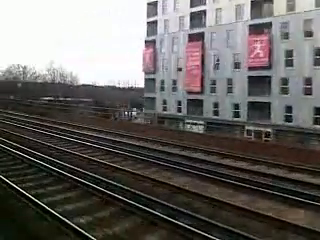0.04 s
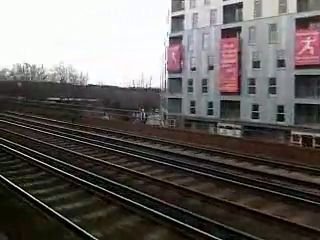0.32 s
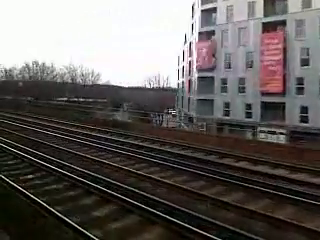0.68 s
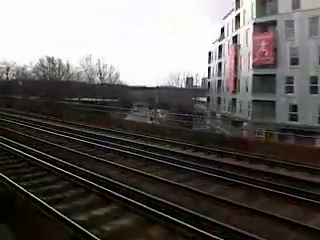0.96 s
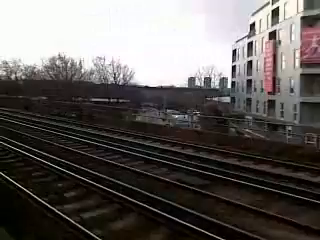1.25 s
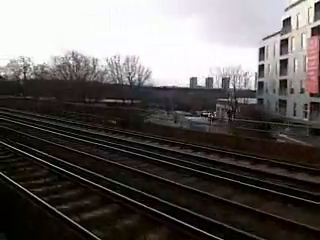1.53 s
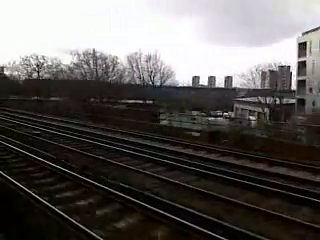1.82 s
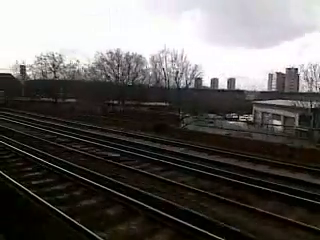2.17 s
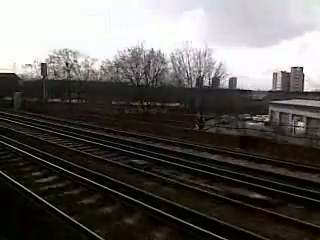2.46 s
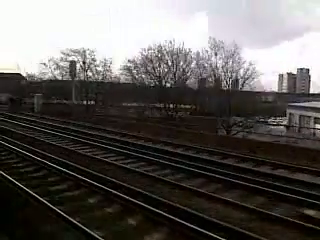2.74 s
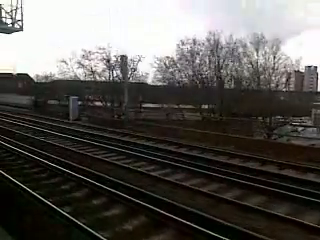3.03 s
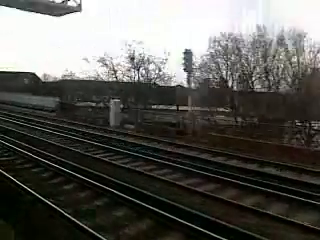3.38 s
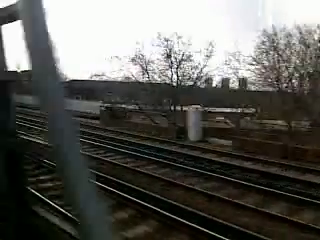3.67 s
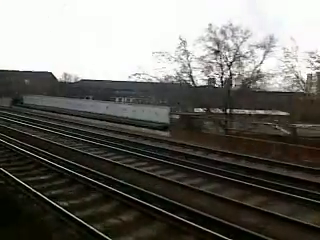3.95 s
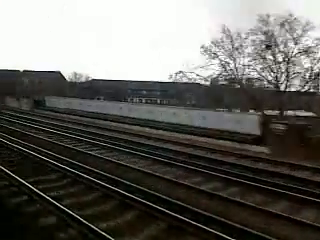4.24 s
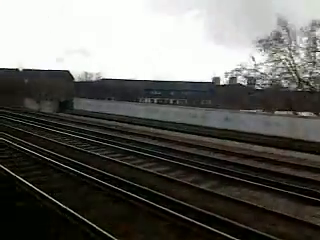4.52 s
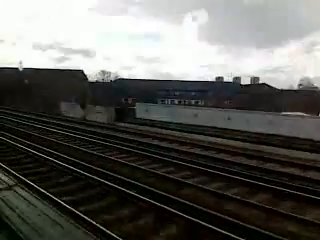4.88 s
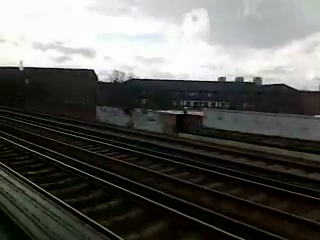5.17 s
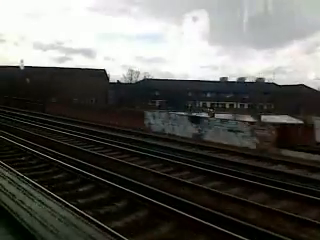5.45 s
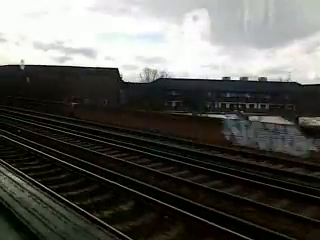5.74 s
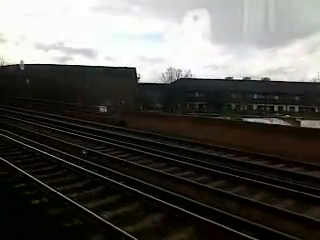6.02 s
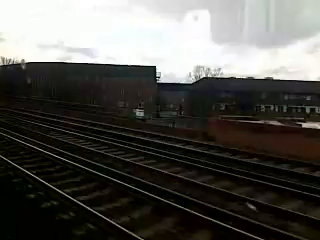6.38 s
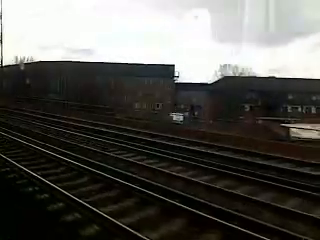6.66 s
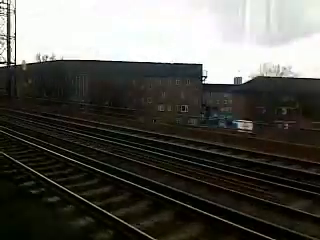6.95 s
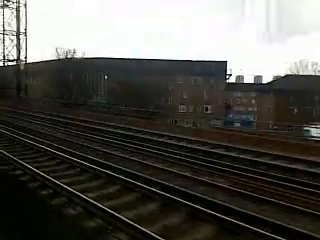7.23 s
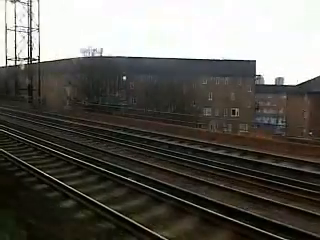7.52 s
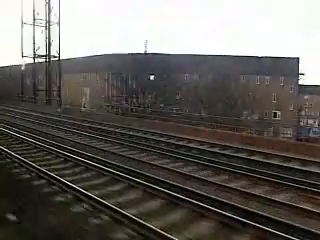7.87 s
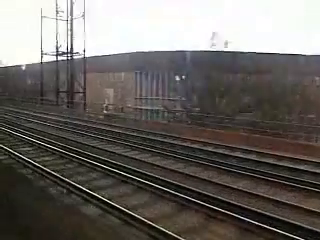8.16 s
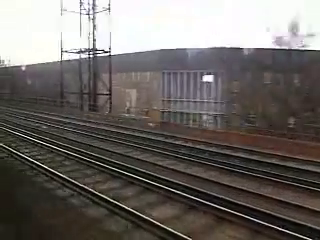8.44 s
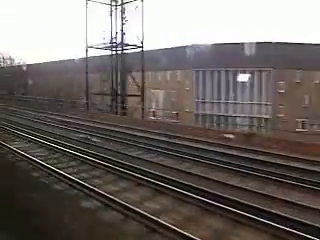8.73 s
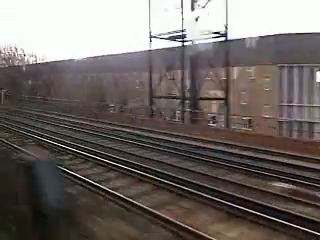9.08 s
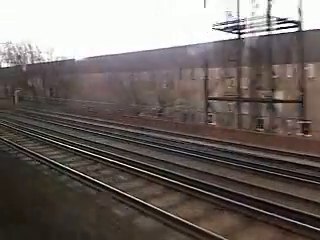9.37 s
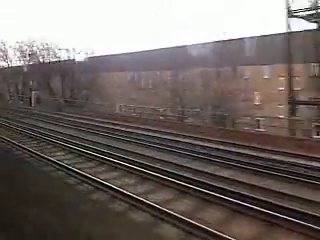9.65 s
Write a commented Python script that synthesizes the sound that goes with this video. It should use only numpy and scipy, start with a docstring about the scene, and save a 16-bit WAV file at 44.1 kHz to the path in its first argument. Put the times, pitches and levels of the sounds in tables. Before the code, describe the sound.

An electric train rumbles along, heard from inside, with a faint gear whine, knocks over points and wheels singing on a curve.

```python
"""Inside an electric train that slowly gathers speed. From the start the body rumbles, the wheels roar on
the rails, a gear whine climbs and an auxiliary machine hums; now and then something rustles faintly.
From 2 s to nearly 4 s the bogies cross a set of points: impacts ring the floor and flanges scrape.
Then side force on a curve makes the wheels sing more and more, until the sound stops abruptly at 8.9 s."""
import sys
import numpy as np
from scipy import signal
from scipy.fft import rfft, irfft
from scipy.io import wavfile

SR = 44100
rng = np.random.default_rng(int(sys.argv[2]) if len(sys.argv) > 2 else 0)


def master(y):
    """Save y as 16-bit WAV."""
    cut = np.clip(np.atleast_2d(y).T, -1, 1)
    pcm = np.round(cut * 32767)  # scale
    wavfile.write(sys.argv[1], SR, pcm.astype(np.int16))


N = 432180
TIME = np.arange(N) / SR
BINS = np.fft.rfftfreq(N, 1 / SR)

# spectrum of the carriage body's vibration: (frequency [Hz], density [dB per Hz])
BODY_SPECTRUM = [(6, -88.5), (18, -62), (30, -60.5), (62, -55.5), (100, -59.5), (170, -59.5), (205, -64),
                 (245, -66), (310, -70.5), (420, -73), (600, -89), (1200, -115)]
# slow course of the deep rumble: (time [s], gain [dB])
DEEP_RUMBLE_GAIN = [(0, 0.5), (1.5, 2.5), (2.6, -3), (4.2, -1.5), (5.6, -1), (6.8, 1), (8.9, -1.5)]
# dips in the track: (centre time [s], duration [s], swell [dB])
TRACK_DIPS = [(2.05, 0.22, 6), (2.57, .1, 6), (3.319, 0.088, 12.5), (4.657, 0.16, 3.5), (6.3, 0.17, 3.5),
              (7.38, 0.22, 2), (7.824, 0.14, 5.5), (8.225, 0.088, 8)]


def body_rumble(sway_db=1.5, crossover_hz=112):
    """Forced vibration: the track shakes the body, whose lowest frequencies swell at each dip."""
    heave_db = sum(db * swell(s, length) for s, length, db in TRACK_DIPS)
    shake_db = follow(DEEP_RUMBLE_GAIN) + sway_db * drift(5) + heave_db
    rumble = noise(BODY_SPECTRUM)
    deep = irfft(rfft(rumble) / (1 + (BINS / crossover_hz) ** 6), N)
    return rumble - deep + deep * gain_of(shake_db)


# rolling noise through floor and windows: (frequency [Hz], density [dB per Hz])
ROLLING_SPECTRUM = [(120, -90), (350, -78), (490, -74.5), (535, -70), (820, -72), (1350, -74.5),
                    (1950, -76), (2170, -77), (2420, -84.5), (3100, -87), (4700, -99), (6300, -102),
                    (9000, -116), (14000, -135)]
# effect of rail roughness on the roar: (time [s], gain [dB])
RAIL_ROUGHNESS = [(0, -1.3), (1, -1.4), (1.35, -0.3), (1.8, -1.2), (2.2, -0.9), (3.4, -3), (4.3, -1.66),
                  (5.6, -0.55), (6.6, -1), (7.3, 0.7), (7.9, -1.5), (8.9, 0)]
# rough patches of rail: (centre time [s], duration [s], level [dB])
HISSING_PATCHES = [(.54, 0.15, -55), (.78, .25, -61), (2.58, 0.27, -67), (5.1, .3, -72),
                   (5.552, 0.2, -56.5), (6.0, 0.51, -66), (7.0, 0.78, -67)]
# spectrum of their hiss: (frequency [Hz], relative level [dB])
PATCH_SPECTRUM = [(1200, -21), (2600, 4), (3400, 1.5), (4200, -12), (6000, -14.5), (12000, -47)]


def rolling_noise(flutter_db=0.83):
    """Roughness excitation: the uneven rail head makes the wheels roar, and hiss on rough patches."""
    roar = noise(ROLLING_SPECTRUM) * gain_of(follow(RAIL_ROUGHNESS) + flutter_db * drift(14))
    hiss = evened(noise(PATCH_SPECTRUM)) * swells(HISSING_PATCHES)
    return roar + hiss


# wheel modes: (frequency [Hz], width [Hz], level on straight track [dB], level in the curve [dB])
WHEEL_RESONANCES = [(1553, 34, -58, -51.5), (1680, 130, -58, -49.5), (1782, 37, -74.5, -54)]
# side force on the wheels: (time [s], share of full force [0-1])
SIDE_FORCE = [(0, 0.06), (3.8, 0.24), (4.6, 0.6), (5.5, 0.84), (6.1, 1), (6.6, 0.6), (7.3, 0.96), (8, 1),
              (8.9, 0.88)]
# clear notes of a single wheel: (centre time [s], duration [s], frequency [Hz], level [dB])
WHEEL_NOTES = [(2.33, 0.051, 1600, -45), (3.07, .25, 1587, -50), (4.75, 0.8, 1570, -52),
               (6.845, 0.06, 1760, -47), (6.9, 0.8, 1620, -55), (8.201, 1.34, 1561, -52)]


def wheel_squeal(flutter_db=0.5):
    """Resonance: side force drives the wheels' own modes, and at times one clear note sings out."""
    force = follow(SIDE_FORCE)
    modes, notes = np.zeros((2, N))
    for hz, width, straight_db, curved_db in WHEEL_RESONANCES:
        modes += narrowband(hz, width) * gain_of(straight_db + (curved_db - straight_db) * force)
    for s, length, hz, db in WHEEL_NOTES:
        note = tone(hz, waver_hz=2.87, flutter_db=1.5, flutter_rate=12.5)
        notes += note * gain_of(db) * swell(s, length)
    return notes + modes * gain_of(flutter_db * drift(6.2))


# tooth meshing rate: (time [s], frequency [Hz])
MESH_RATE = [(0, 1030), (2, 1041), (4, 1057), (5.4, 1069), (7, 1081), (8.9, 1095)]
# whine under changing gear load: (time [s], level [dB])
WHINE_LEVEL = [(0, -72), (.4, -50), (1.05, -56), (1.3, -49.5), (1.75, -52), (2, -48.5), (2.4, -59.5),
               (2.6, -44.5), (3.15, -61.5), (3.9, -59), (4.35, -48.5), (4.72, -44.5), (5.0, -57.5),
               (5.22, -44), (5.48, -45), (5.63, -54), (5.88, -45.5), (6.2, -57.5), (6.45, -48.5),
               (7.0, -54.5), (7.35, -47.5), (7.67, -50.5), (8.0, -46), (8.42, -52.5), (8.68, -46.5),
               (8.9, -57.5)]
# bands that follow the speed: (multiple of mesh rate [1], width [Hz], start level [dB], end level [dB])
GEAR_BANDS = [(1, 100, -51.5, -52), (1.5, 24.04, -57, -49), (2, 53, -54.5, -57), (2.52, 80.2, -72, -62.5),
              (3.05, 160, -85.5, -60.5), (3.9, 497, -84, -72)]


def gear_whine():
    """Periodic excitation: meshing teeth give a tone and noise bands whose pitch rises with speed."""
    mesh_hz = follow(MESH_RATE)
    progress = (mesh_hz - mesh_hz[0]) / (mesh_hz[-1] - mesh_hz[0])
    whine = tone(mesh_hz, waver_hz=2.2, flutter_db=2.2, flutter_rate=14) * gain_of(follow(WHINE_LEVEL))
    for multiple, width, start_db, end_db in GEAR_BANDS:
        whine += narrowband(mesh_hz * multiple, width) * gain_of(start_db + (end_db - start_db) * progress)
    return whine


# wheel blows: (time [s], floor thump [dB], tilt of floor modes [dB per octave], boom [dB], clatter [dB])
WHEEL_BLOWS = [(2.000, -30, 3, -38, -42), (2.225, -27, 5, -32, -34), (2.312, -37.5, 2.5, -45.5, -37),
               (2.447, -22, 6, -38.5, -38.5), (2.498, -26, 1.5, -38, -43), (2.555, -25, -1.5, -40, -44.5),
               (2.569, -18, -0.5, -30.5, -25), (2.592, -31, -1, -36, -40.5), (2.626, -27, -1.5, -40.5, -39),
               (2.751, -29, -2.5, -52, -54), (2.879, -23, 6, -33, -39.5), (2.994, -19.5, 1, -31.5, -38),
               (3.020, -28, -3, -42, -43), (3.046, -27, 9, -43, -49), (3.110, -20.5, 3, -27, -46),
               (3.244, -34, -7, -46, -35.5), (3.543, -19, -2, -38, -47), (3.563, -28.5, 2, -38, -44),
               (3.667, -26, -11, -41, -50)]
# floor modes: (frequency [Hz], relative level [dB], t60 [s])
FLOOR_RESONANCES = [(151, -5, 0.16), (172.5, 2, .15), (209.3, 1.3, .135), (258.3, -7, 0.12),
                    (338, -14, 0.081)]
# the bogie's hollow boom: (frequency [Hz], relative level [dB])
BOOM_SPECTRUM = [(90, -24.5), (220, -4), (330, -1), (450, -3), (560, -0.5), (700, -1), (900, -14),
                 (1300, -21), (4000, -64.5)]
# steel clattering or scraping on steel: (frequency [Hz], relative level [dB])
STEEL_SPECTRUM = [(80, -33), (250, -5), (420, -2), (570, -0.5), (850, -4), (1450, -7.5), (2100, -22),
                  (4000, -38), (9000, -72.5)]


def points_knocks(boom_t60=0.16, clatter_t60=0.096, bounce_s=0.015, scatter_s=0.0028, bounce_db=-10):
    """Impact excitation: each blow on the points rings floor and bogie; the rebounding wheel clatters."""
    t = np.arange(SR // 3) / SR
    cushioned = 1 - np.exp(-t / 0.0074)  # the springs soften the onset
    thumps, boom_level, clatter_level = np.zeros((3, N))
    for s, thump_db, tilt_db, boom_db, clatter_db in WHEEL_BLOWS:
        floor = ring(FLOOR_RESONANCES, t, detune=0.032, tilt_db=tilt_db)
        add(thumps, s, cushioned * gain_of(thump_db) * floor)
        add(boom_level, s, cushioned * gain_of(boom_db - 60 * t / boom_t60))
        for bounce in range(3):
            contact_s = s + bounce * (bounce_s + scatter_s * rng.standard_normal())
            decay = gain_of(clatter_db + bounce * bounce_db - 60 * t / clatter_t60)
            add(clatter_level, contact_s, hard_onset(t) * decay)
    boom = boom_level * evened(noise(BOOM_SPECTRUM))
    clatter = clatter_level * evened(noise(STEEL_SPECTRUM))
    return thumps + boom + clatter


# clanks of loose steel: (time [s], level [dB])
STEEL_CLANKS = [(2.572, -34.5), (3.123, -33), (3.137, -30.5), (3.263, -44)]
# its modes: (frequency [Hz], relative level [dB], t60 [s])
STEEL_RESONANCES = [(533, 0, 0.0613), (760, -1, .05), (847, 1.5, 0.084), (953, 0.5, 0.058)]


def loose_steel():
    """Free vibration: loose steel, jolted on the points, rings in its damped modes."""
    t = np.arange(SR // 3) / SR
    clanks = np.zeros(N)
    for s, db in STEEL_CLANKS:
        add(clanks, s, hard_onset(t) * gain_of(db) * ring(STEEL_RESONANCES, t, detune=0.0071))
    return clanks


# flanges against the blades of the points: (start time [s], hold time [s], level [dB])
FLANGE_CONTACTS = [(2.215, 0.094, -39), (2.466, 0.058, -39.5), (3.133, 0.17, -46.5)]


def flange_scrapes(rise_db_per_s=112, fall_db_per_s=221.5, coarse_db=0.5):
    """Sliding friction: scrapes build, hold and let go as the blades steer the wheels."""
    level = np.zeros(N)
    for s, length, db in FLANGE_CONTACTS:
        before, after = np.maximum(s - TIME, 0), np.maximum(TIME - s - length, 0)
        level = np.maximum(level, gain_of(db - rise_db_per_s * before - fall_db_per_s * after))
    return evened(noise(STEEL_SPECTRUM)) * level * gain_of(coarse_db * drift(30))


# the hum fades and returns: (centre time [s], duration [s], gain [dB])
HUM_DIPS = [(.3, 0.25, -5), (.83, 0.37, -15.5), (1.62, 0.48, -7), (2.4, 0.14, -19.5), (2.76, 0.17, -12.5),
            (3.2, .36, -10.5), (3.72, 0.25, -19), (5.33, 0.22, -24), (5.98, 0.2, -6), (6.88, 0.13, -18),
            (7.35, 0.27, -12), (7.87, 0.11, -8), (8.58, 0.23, -8)]
# panel modes: (frequency [Hz], width [Hz], level [dB])
PANEL_RESONANCES = [(226, 8, -53.5), (259, 22, -55.5), (335, 25, -58), (395, 13, -55), (435, 30, -57),
                    (540, 25, -59)]


def auxiliary_hum(hum_hz=454, hum_db=-47.5):
    """Forced and resonant vibration: a constant-speed machine hums; panels drone at their own pitches."""
    level_db = hum_db + sum(db * swell(s, length) for s, length, db in HUM_DIPS)
    hum = tone(hum_hz, waver_hz=1.29, flutter_db=3.5, flutter_rate=9.7) * gain_of(level_db)
    panels = sum(narrowband(hz, width) * gain_of(db) for hz, width, db in PANEL_RESONANCES)
    return hum + panels


# faint rustles close by: (centre time [s], duration [s], level [dB])
RUSTLE_BURSTS = [(.55, 0.069, -70), (3.2, 0.12, -66), (3.298, 0.055, -62), (5.06, 0.083, -68),
                 (5.72, .07, -68.5), (5.914, .07, -71)]
# their spectrum: (frequency [Hz], relative level [dB])
RUSTLE_SPECTRUM = [(1000, -26), (3500, 5), (7000, 10.5), (10500, 0), (14000, -12)]


def rustles(grain_db=1.5):
    """Amplitude modulation: brief, grainy swells of bright noise are heard as soft brushing."""
    return swells(RUSTLE_BURSTS) * evened(noise(RUSTLE_SPECTRUM)) * gain_of(grain_db * drift(90))


# background hiss: (frequency [Hz], density [dB per Hz])
HISS_SPECTRUM = [(3000, -128), (9500, -118), (12000, -113), (14000, -110.5)]


def background_hiss():
    """Stationary noise: a faint, steady hiss in the high treble."""
    return noise(HISS_SPECTRUM)


def gain_of(db):
    """Decibels to an amplitude ratio."""
    return 10 ** (np.asarray(db) / 20)


def evened(x):
    """Normalisation to rms 1."""
    return x / np.sqrt(np.mean(x ** 2) + 1e-20)


def follow(rows):
    """Linear interpolation of (time [s], value) rows at every sample."""
    return np.interp(TIME, *np.transpose(rows))


def add(mix, s, sound):
    """Superposition: mixes a sound in at time s."""
    part = mix[max(round(s * SR), 0):][:len(sound)]
    part += sound[:len(part)]


def swell(s, length):
    """Gaussian envelope of height 1 around time s."""
    return np.exp(-(2 * (TIME - s) / length) ** 2)


def swells(rows):
    """Sum of Gaussian envelopes from (centre time [s], duration [s], level [dB]) rows."""
    return sum(gain_of(db) * swell(s, length) for s, length, db in rows)


def hard_onset(t, rise_s=0.00269):
    """The fast rise of a steel-on-steel impact."""
    return 1 - np.exp(-(t / rise_s) ** 2)


def noise(spectrum):
    """Spectral shaping of white noise to (frequency [Hz], density [dB per Hz]) rows."""
    hz, db = np.transpose(spectrum)
    shape = gain_of(np.interp(np.log(BINS + 1), np.log(hz + 1), db))
    return irfft(rfft(rng.standard_normal(N)) * shape, N) * np.sqrt(SR / 2)


def drift(rate):
    """Low-pass noise of rms 1 that changes up to about rate times a second."""
    return evened(irfft(rfft(rng.standard_normal(N)) / (1 + (BINS / rate) ** 2), N))


def narrowband(hz, width):
    """A noise-driven resonance of rms 1 around a fixed or moving frequency."""
    phase = 2 * np.pi * np.cumsum(hz * np.ones(N)) / SR
    return evened(drift(width * 0.75) * np.cos(phase) + drift(width * 0.75) * np.sin(phase))


def tone(hz, waver_hz, flutter_db, flutter_rate):
    """A sinusoid of rms 1 with random frequency and amplitude modulation."""
    phase = 2 * np.pi * np.cumsum(hz + waver_hz * drift(5.65)) / SR
    return evened(np.sin(phase) * gain_of(flutter_db * drift(flutter_rate)))


def ring(modes, t, detune, tilt_db=0):
    """Damped modes, detuned at random for each blow; a positive tilt favours the high ones."""
    hz, db, t60 = np.transpose(modes)[:, :, None]
    spread = 1 + detune * rng.standard_normal(hz.shape)
    db = db + tilt_db * (np.log2(hz) - np.log2(hz[1]))
    return (gain_of(db - 60 * t / t60) * np.sin(2 * np.pi * hz * spread * t)).sum(0)


def scene():
    """Superposition of all sources at a window seat, in mono."""
    running = body_rumble() + rolling_noise() + wheel_squeal() + gear_whine()
    points = points_knocks() + loose_steel() + flange_scrapes()
    background = auxiliary_hum() + rustles() + background_hiss()
    return (running + points + background)[None]


def record(dry):
    """Gating and band limiting: the sound stops within milliseconds; a low-pass trims the top treble."""
    stop_s, release_s, cutoff_hz = 8.909, 0.002, 14300
    gate = np.exp(-np.maximum(TIME - stop_s, 0) / release_s)
    lowpass = signal.firwin(1023, cutoff_hz, window=("kaiser", 9), fs=SR)
    return signal.oaconvolve(dry * gate, lowpass[None], "same")


dry = scene()
out = record(dry)
master(out)
```